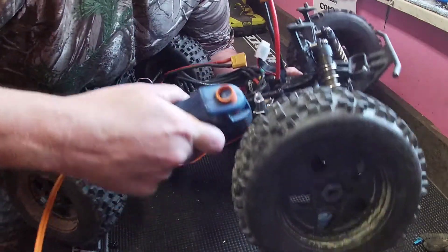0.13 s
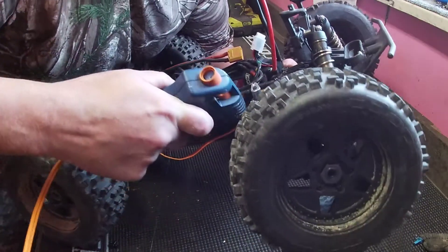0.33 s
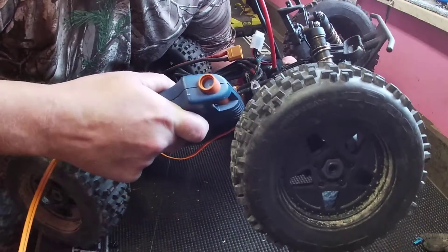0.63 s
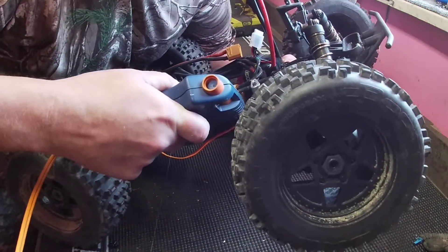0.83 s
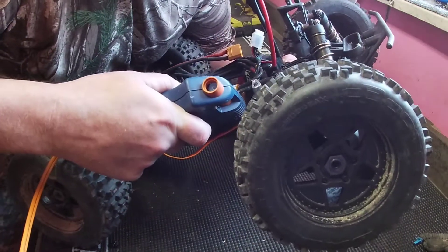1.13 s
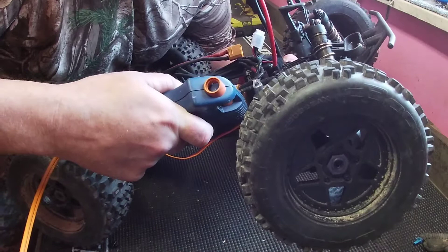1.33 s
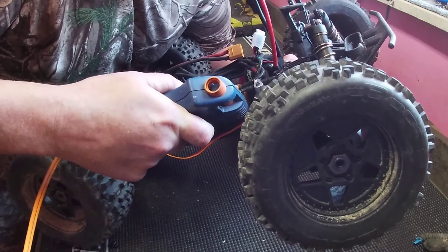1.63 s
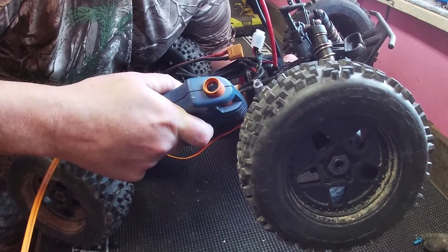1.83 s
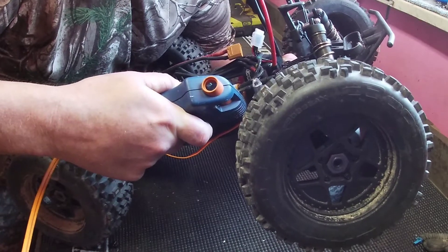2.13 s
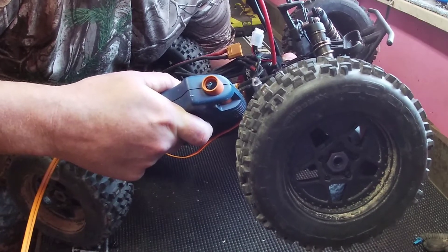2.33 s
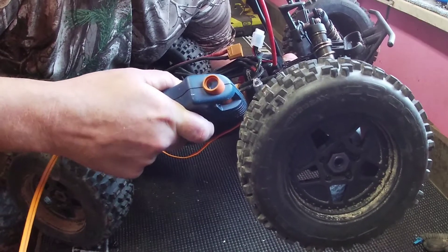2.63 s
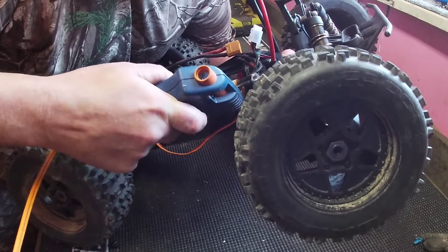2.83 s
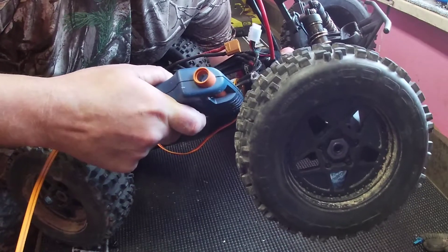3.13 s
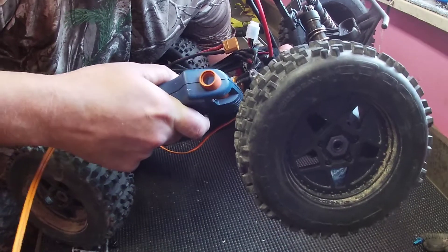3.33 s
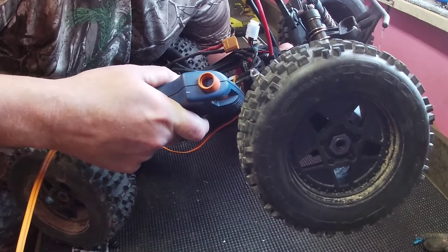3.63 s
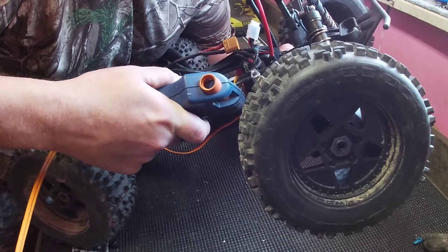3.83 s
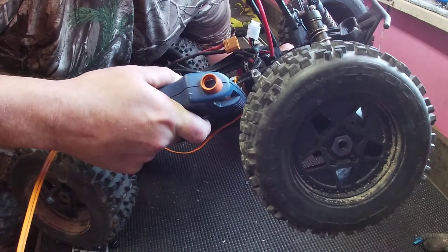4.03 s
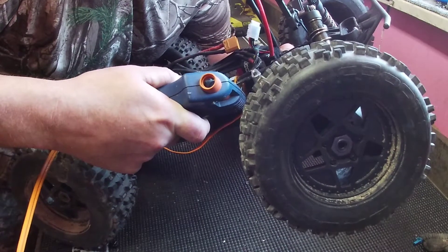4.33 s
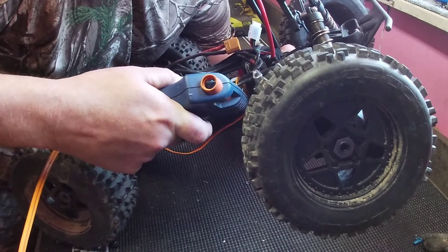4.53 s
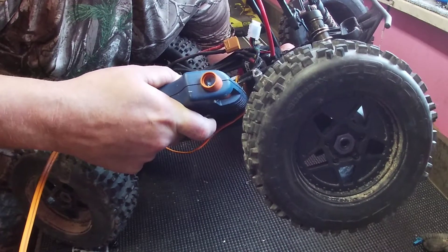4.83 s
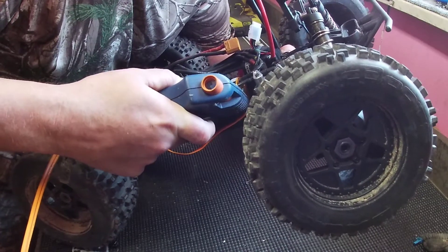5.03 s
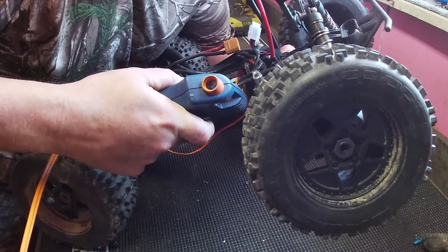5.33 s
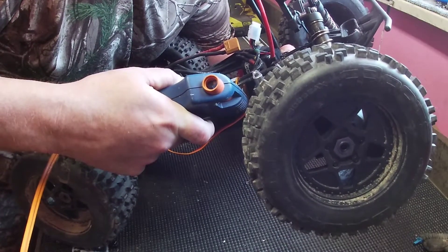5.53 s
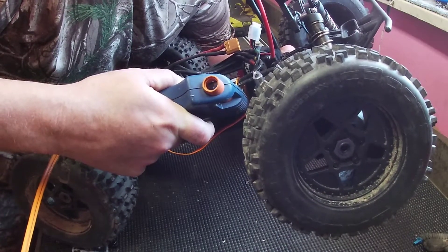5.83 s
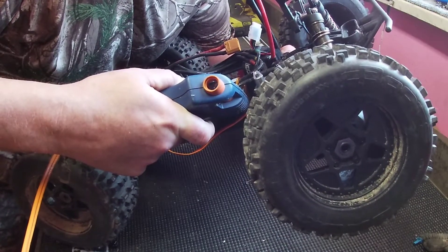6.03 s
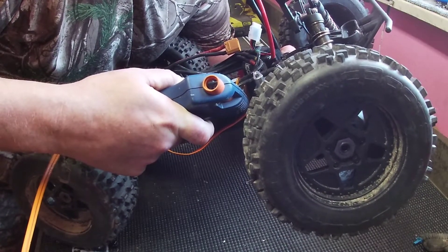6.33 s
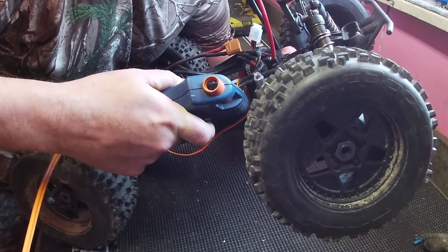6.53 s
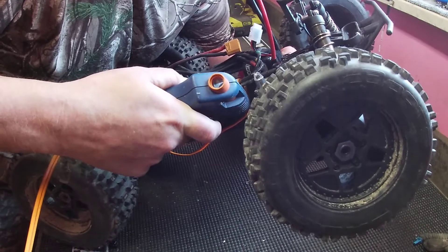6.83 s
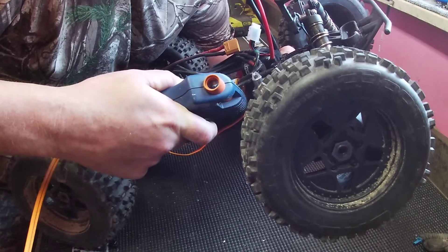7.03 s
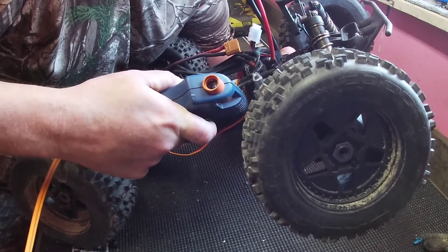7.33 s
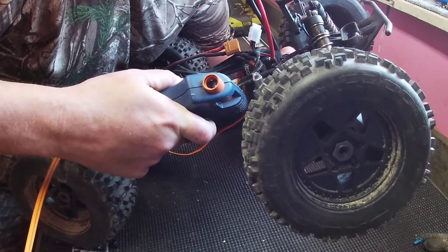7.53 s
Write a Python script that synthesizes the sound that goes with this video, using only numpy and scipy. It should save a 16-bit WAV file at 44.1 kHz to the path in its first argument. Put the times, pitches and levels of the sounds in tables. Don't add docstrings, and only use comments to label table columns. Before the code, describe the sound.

A hand jostles a hollow plastic tool with rattling bounces, skin drag and low microphone rumble. Three trigger squeezes follow, each a grainy, woody-bright creak of quick clicks blurring into rub, with pauses between. Sharp plastic snaps end the squeezes, with little scrapes sliding into them and soft bench thumps below. A fourth creak begins at the end. Very close and dry, with a short small-room reflection.

```python
import sys
import numpy as np
from scipy import signal
from scipy.fft import rfft, irfft
from scipy.io import wavfile
from scipy.ndimage import uniform_filter1d

SR = 44100
rng = np.random.default_rng(int(sys.argv[2]) if len(sys.argv) > 2 else 0)


def decibels_to_gain(level_db):
    exponent = np.asarray(level_db, float) / 20
    return 10 ** exponent


def unload_audio(sound):
    columns = np.transpose(np.atleast_2d(sound))
    steps = np.round(np.clip(columns, -1, 1) * 32767)
    wavfile.write(sys.argv[1], SR, steps.astype(np.int16))


N = 338247

# frequency in Hz, level in dB.
ROOM_TONE = [(18, -37.5), (30, 0), (96, -22), (163, -2), (270, -13), (356, -12), (620, -8), (840, -9.5),
             (1110, -16), (4910, -21), (12500, -33), (16200, -72), (22000, -120)]
ROOM_TONE_DB = -70.5

# start in seconds, length in seconds, first level in dB,
# last level in dB, treble against it in dB.
DRAGS = [(0, 0.11, -37.5, -55.5, -7), (.15, 0.096, -41, -41.5, -3), (.27, 0.38, -47.5, -73, -10.5),
         (.7, 0.28, -67.5, -42.5, -19), (3.24, 0.18, -71.5, -50, -5), (3.57, 0.17, -49, -50, -20),
         (3.87, 0.27, -51, -54, -28), (4.786, .12, -31, -51.5, -44), (4.91, 0.22, -51.5, -39, -12.5),
         (5.185, 0.068, -36, -51, -36), (6.78, .31, -49.5, -47.5, -10), (7.091, 0.067, -31, -57.5, -26),
         (7.17, 0.24, -48.5, -54.5, -16)]
# start in seconds, length in seconds, first level in dB,
# last level in dB, bench boom against it in dB.
LEANS = [(0, 0.15, -43, -67, -4), (.15, 0.4, -42.5, -74.5, 1), (.686, 0.19, -57.5, -71.5, 4.5),
         (2.795, 0.082, -78.5, -95, 19), (3.33, 0.083, -65.5, -65, 15.5), (3.48, 0.19, -59, -58, -3),
         (3.9, 0.22, -55, -68.5, -3.5), (4.786, 0.078, -64, -53, 6.5), (4.9, 0.26, -57, -49.5, -4),
         (6.834, 0.16, -74, -52, 16.5), (7.0, 0.41, -47.5, -61.5, -4)]
HAND_RISE_DB_S, HAND_FALL_DB_S = 500, 223

# start in seconds, length in seconds, first level in dB, last level in dB.
JOLTS = [
    (0, 0.24, -44.5, -39),
    (.19, 0.38, -37, -69),
    (.64, 0.65, -67, -90),
    (3.35, .1, -83.5, -78),
    (3.93, 0.088, -78, -75),
    (4.8, 0.11, -71, -92),
    (5.17, 0.15, -62, -73),
    (6.92, .05, -82.5, -75),
]
JOLT_RISE_DB_S, JOLT_FALL_DB_S = 198.5, 150

# frequency in Hz, width in Hz, level in dB.
SHELL = [(538, 33, 25), (1030, 32, -1.5), (1410, 190, -18.5), (1460, 80, -11), (3363, 15, 2.5),
         (6270, 160, -11.5), (6820, 110, -17), (7400, 23, -14), (7600, 81, -36), (9300, 290, -34.5)]
# start in seconds, peak in dB, hollow ring in dB, its pitch in Hz.
CRACKS = [
    (0.0171, -19.5, -12, 850),
    (6.831, -19, -0.5, 1030),
    (7.122, -9.5, -11.5, 580),
]
# start in seconds, peak in dB, hollow ring in dB,
# its pitch in Hz.
TICKS = [(0.118, -30, -10, 1030), (0.3076, -35.5, 8.5, 1090), (0.8124, -32.5, 2, 3400),
         (0.9329, -31.5, -13, 950), (0.9666, -22.5, -12, 1030), (0.9872, -31.5, -2.5, 1030),
         (3.3342, -39.5, 8.5, 427), (3.4466, -29, -11, 1030), (3.6284, -33.5, -1, 1090),
         (3.6812, -27.5, -39, 1470), (4.7746, -30, -14, 1030), (5.0783, -23.5, -6.5, 1030),
         (5.1207, -29.5, -11, 490), (6.893, -38, 2, 457)]
# start in seconds, peak in dB, hollow ring in dB, its pitch in Hz.
CLATTER = [
    (0.1474, -29.5, -5, 1140),
    (.1585, -22.5, 8, 1460),
    (0.1759, -20, 5.5, 1410),
    (.2017, -26.5, 11.5, 1410),
    (0.2097, -27, 3, 1720),
    (.2215, -27.5, 3.5, 1750),
    (0.6886, -50.5, 12, 626),
    (.915, -44, -14, 1010),
    (3.3598, -44, 1.5, 1340),
]
# start in seconds, peak in dB, hollow ring in dB, its pitch in Hz.
KNOCKS = [(1.0095, -28.5, -3, 3060), (1.0836, -33.5, -11, 1360), (2.6928, -63, 10.5, 1040),
          (3.248, -52, -20, 1006), (3.291, -57, -32, 990), (3.318, -47, -0.5, 960),
          (3.5734, -34.5, -2.5, 1170), (3.6457, -32.5, -4.5, 580), (3.765, -37.5, -10, 720),
          (4.0393, -32.5, 1, 596), (6.8462, -31, -6, 1030)]
# start in seconds, peak in dB, hollow ring in dB, its pitch in Hz.
SNAPS = [
    (2.379, -37.5, -45, 1736),
    (2.413, -41, -19.5, 1750),
    (2.7947, -10, -11.5, 1084),
    (4.6648, -34.5, -12.5, 1037),
    (4.785, -9.5, -10, 1030),
    (5.3784, -64.5, 8, 1319),
    (6.812, -23.5, -2.5, 1220),
    (7.0913, -13, -9, 1860),
]
# treble in dB, rattle length in seconds.
CONTACTS = [
    (3, 0.0064),
    (2, 0.013),
    (-9.5, 0.013),
    (-11.5, 0.008),
    (7, 0.0034),
]

# start in seconds, end in seconds, first level in dB,
# last level in dB, ring in Hz.
SCRAPES = [
    (0.146, .238, -38.5, -46, 1524),
    (2.729, 2.797, -65.5, -30, 1087),
    (3.354, 3.42, -57, -58, 2400),
    (4.715, 4.795, -66, -33.5, 1056),
    (5.211, 5.229, -36.5, -53, 2390),
    (6.753, 6.833, -63, -44, 1140),
    (6.888, 6.95, -61, -65, 2450),
    (6.96, 7.027, -55, -62, 3300),
    (7.053, 7.102, -64, -43, 1470),
]
# start in seconds, end in seconds, first level in dB,
# last level in dB, ring in Hz.
SQUEAKS = [
    (0.691, 0.796, -66.5, -68, 1360),
    (0.885, 1.002, -72.5, -57, 1027),
    (1, 1.143, -61, -69, 2170),
    (3.468, 3.56, -71, -73, 1650),
    (6.9, 7.038, -58.5, -57, 1920),
    (6.94, 7.0, -51, -64, 2597),
    (7.01, 7.042, -61, -60, 950),
]
SCRAPE_RING_DB, SCRAPE_RING_T60_S = 3, 0.017
SQUEAK_RING_DB, SQUEAK_RING_T60_S = 11, 0.033

# start in seconds, peak in dB, pitch in Hz.
THUMPS = [(0.154, -38.5, 168), (0.687, -45.5, 336), (3.321, -50, 180), (3.335, -44, 174),
          (4.781, -47.5, 366), (0.971, -49.5, 463), (2.799, -44, 482), (4.785, -32.5, 500),
          (6.851, -39.5, 200), (6.926, -37, 183), (6.946, -32, 180)]

# start in seconds, length in seconds, first level in dB,
# last level in dB, slips per second.
GLIDES = [(1.03, .14, -46.5, -58.5, 164), (1.22, 0.031, -55, -49, 182), (1.385, .2, -59.5, -48.5, 180),
          (1.6, .4, -55.5, -60.5, 112), (2.02, .21, -40.5, -45, 111), (3.83, 0.11, -55, -41, 164),
          (3.97, 0.36, -54, -58, 106), (4.33, 0.12, -37, -38.5, 107), (5.39, 0.038, -60.5, -59.5, 157),
          (5.455, .085, -51.5, -51, 170), (5.6, .09, -47.5, -48.5, 140), (5.69, .23, -39, -40.5, 119),
          (5.99, .14, -43.5, -51, 109), (6.15, .2, -56, -61.5, 80), (6.46, .15, -40.5, -52, 100),
          (7.17, .08, -39.5, -44.5, 166), (7.315, .03, -48, -47, 152), (7.352, 0.155, -42, -37, 150),
          (7.5, 0.1, -36, -39.5, 100), (7.645, .03, -49, -38.5, 146)]
GLIDE_RISE_DB_S, GLIDE_FALL_DB_S = 900, 400
# start in seconds, peak in dB.
SLIPS = [(1.4586, -31.5), (1.4958, -37), (1.5112, -29.5), (1.526, -29.5), (1.541, -34), (1.5765, -40),
         (1.5954, -25.5), (1.615, -32), (1.6303, -24), (1.6566, -24), (1.6872, -24), (1.7207, -22.5),
         (1.7492, -25), (1.7765, -23.5), (1.8081, -20.5), (1.8416, -21.5), (1.8748, -20.5),
         (1.9053, -21.5), (1.9331, -20), (1.9724, -21), (2.0077, -25), (2.027, -22.5),
         (2.0735, -25.5),
         (4.0706, -27), (4.0828, -28.5), (4.1063, -22.5), (4.1411, -27.5), (4.1643, -31),
                (4.1874, -21), (4.2292, -20.5), (4.2504, -25), (4.2718, -21), (4.29, -22), (4.309, -29),
                (4.3346, -23), (4.365, -27.5), (4.3845, -25),
         (5.7218, -27), (5.9896, -43), (6.0041, -34), (6.018, -30), (6.051, -30.5), (6.1339, -32.5),
               (6.1524, -27), (6.1795, -22), (6.21, -25), (6.2311, -25), (6.258, -25), (6.279, -27.5),
               (6.2992, -22.5), (6.3184, -26), (6.3384, -22), (6.3853, -20.5), (6.4162, -22), (6.4614, -19),
               (6.488, -33), (6.5078, -22.5), (6.5535, -28), (6.5633, -25)]
# frequency in Hz, level in dB, decay t60 in seconds.
BODY = [(1020, -25.5, 0.015), (1231, -19.5, 0.0178), (2115, -10, 0.011), (2400, -22.5, 0.02),
        (2911, -8.5, 0.026), (3085, -3, 0.009), (3560, -5.5, 0.014), (3910, -2.5, 0.0051),
        (4490, -3.5, 0.005), (4800, -12.5, 0.012), (5670, -12, 0.0056), (6125, -9.5, 0.0054),
        (7220, -5.5, 0.0034), (7840, -15.5, 0.01), (8620, -17.5, 0.011), (9480, -9.5, 0.0039),
        (11997, -19.5, 0.0016), (13100, -7.5, 0.0017)]
RUB_DB, RUB_DB_PER_RATE = -3, 0.17
UPPER_DB, LOWER_DB = -9, -3
BRIGHTENS = 0.45
DULLS_DB_PER_RATE = 0.0724
WANDER_DB = 2

DIFFUSERS = [(13, .55), (31, .5)]
ECHO_S, ECHO_DB = 0.0139, -12
CLUTTER_DB, CLUTTER_START_S, CLUTTER_END_S = -4.5, 0.002, 0.0105
ROOM_DB, ROOM_T60_S = -8, 0.22
# frequency in Hz, level in dB.
MIC = [(5200, 5.5), (6600, -2), (8500, 3), (10500, -6), (12500, -21.5), (15000, -17), (15500, -29.5),
       (16000, -60)]


def rms_one(x):
    return x / np.sqrt(np.mean(x ** 2) + 1e-20)


def noise():
    return rng.standard_normal(N)


def band(x, lo_hz, hi_hz):
    return signal.sosfilt(signal.butter(2, [lo_hz, hi_hz], "band", fs=SR, output="sos"), x)


def drift(rate_hz):
    return rms_one(band(noise(), rate_hz / 8, rate_hz))


def ring(x, hz, t60):
    r, w = decibels_to_gain(-60 / (t60 * SR)), 2 * np.pi * hz / SR
    return signal.lfilter([0, np.sin(w)], [1, -2 * r * np.cos(w), r * r], x + 1e-18)


def shaped(x, points):
    hz, level_db = np.transpose(points)
    grid = np.maximum(np.arange(N // 2 + 1) * SR / N, 1)
    return irfft(rfft(x) * decibels_to_gain(np.interp(np.log(grid), np.log(hz), level_db)), N)


def shell(x, lo_hz, hi_hz, broad_db):
    click = np.zeros(8192)
    click[0] = 1
    reply = decibels_to_gain(broad_db) * click
    for hz, width_hz, level_db in SHELL:
        if lo_hz <= hz < hi_hz:
            height = decibels_to_gain(level_db) * width_hz * 6 / SR
            reply = reply + height * ring(click, hz, 1.2 / max(width_hz, 30))
    reply = band(reply, lo_hz, hi_hz)
    return signal.oaconvolve(x, reply / np.linalg.norm(reply))[:N]


def strokes(rows, rise_db_s, fall_db_s):
    t, rows = np.arange(0, N, 32) / SR, np.array(rows, float)
    levels = []
    for start, length, first_db, last_db in rows[:, :4]:
        slope = np.interp(t, [start, start + length], [first_db, last_db])
        rise = rise_db_s * np.maximum(start - t, 0)
        fall = fall_db_s * np.maximum(t - start - length, 0)
        levels.append(slope - rise - fall)
    levels = np.array(levels)
    loudest = np.maximum(levels.max(axis=0), -130)
    columns = np.vstack([loudest, rows[levels.argmax(axis=0), 4:].T])
    return np.repeat(uniform_filter1d(columns, size=8, axis=1), 32, axis=1)[:, :N]


def room_tone():
    hush = decibels_to_gain(ROOM_TONE_DB) * rms_one(shaped(noise(), ROOM_TONE))
    return band(hush, 12, 12000)


def hand():
    drag_db, high_db = strokes(DRAGS, HAND_RISE_DB_S, HAND_FALL_DB_S)
    lean_db, bench_db = strokes(LEANS, HAND_RISE_DB_S, HAND_FALL_DB_S)
    grains = rms_one(noise() * decibels_to_gain(3 * drift(40) + 3 * drift(500)))
    upper = decibels_to_gain(drag_db - 8.5) * shell(grains, 900, 4300, -10.5)
    high = decibels_to_gain(drag_db + high_db - 8) * shell(grains, 4500, 8500, 0)
    hollow = decibels_to_gain(lean_db - 4) * shell(grains, 450, 1500, -11.5)
    bench = decibels_to_gain(lean_db + bench_db - 4.5) * shell(noise(), 130, 270, -19)
    return upper + high + hollow, bench


def microphone_shake():
    level_db = strokes(JOLTS, JOLT_RISE_DB_S, JOLT_FALL_DB_S)[0]
    return decibels_to_gain(level_db) * rms_one(band(noise(), 11, 30))


def knocks():
    upper, low, high = np.zeros((3, N + 4200))
    t = np.arange(4096) / SR
    for rows, (high_db, length) in zip((SNAPS, CLATTER, TICKS, KNOCKS, CRACKS), CONTACTS):
        fade = decibels_to_gain(-30 * t / length)
        for start, peak_db, low_db, low_hz in rows:
            grit = rng.standard_normal(4096) * decibels_to_gain(4 * rng.standard_normal(4096))
            even = np.linalg.norm(fade) / np.linalg.norm(grit * fade)
            rattle = decibels_to_gain(peak_db - 6.5) * grit * fade * even
            hollow = ring(rattle, low_hz, 0.015) + decibels_to_gain(-15.5) * ring(rattle, 507, 0.057)
            first = round(start * SR) + 30
            span = slice(first, first + 4096)
            upper[span] += rattle
            low[span] += hollow * decibels_to_gain(low_db - 11.5)
            high[span] += rattle * decibels_to_gain(high_db)
    bright = shell(upper[:N], 1500, 5060, 0) + shell(high[:N], 3610, 13760, -13.5)
    return bright + band(low[:N], 520, 3600)


def scrapes():
    out, t = np.zeros(N), np.arange(N) / SR
    grit = rms_one(noise() * decibels_to_gain(1.1 * drift(200) + 5 * drift(1100)))
    rows = [(*row, SCRAPE_RING_DB, SCRAPE_RING_T60_S) for row in SCRAPES]
    rows += [(*row, SQUEAK_RING_DB, SQUEAK_RING_T60_S) for row in SQUEAKS]
    for start, end, first_db, last_db, hz, ring_db, t60 in rows:
        span = slice(round(start * SR), round((end + 0.05) * SR))
        level_db = np.interp(t[span], [start, end, end + 0.003], [first_db, last_db, -120])
        stroke = grit[span] * decibels_to_gain(level_db)
        out[span] += band(stroke + decibels_to_gain(ring_db - 22.5) * ring(stroke, hz, t60), 700, 6300)
    return out


def thumps():
    out = np.zeros(N)
    for start, peak_db, hz in THUMPS:
        click = np.zeros(N)
        click[round(start * SR)] = decibels_to_gain(peak_db + 4)
        out += ring(click, hz, 0.083)
    return band(out, 90, 500)


def creak():
    level_db, per_s = strokes(GLIDES, GLIDE_RISE_DB_S, GLIDE_FALL_DB_S)
    dulled_db = DULLS_DB_PER_RATE * (per_s - 110)
    upper_db = UPPER_DB + BRIGHTENS * (level_db + 49) - dulled_db
    lower_db = LOWER_DB - BRIGHTENS * (level_db + 45)
    lower_db, upper_db = np.minimum(lower_db, 5), np.minimum(upper_db, -2)

    turns = np.cumsum(per_s * decibels_to_gain(0.8 * drift(60))) / SR
    chatter = -np.diff(np.floor(turns), prepend=0) * decibels_to_gain(2 * noise())
    rub_db = RUB_DB + RUB_DB_PER_RATE * (per_s - 130)
    drag = rms_one(chatter) + decibels_to_gain(rub_db - 6 + 3 * drift(66)) * noise()

    lone = np.array(SLIPS)
    at, peak_db = ((lone[:, 0] + 0.0006) * SR).astype(int), lone[:, 1]
    spread = decibels_to_gain(1.3 * rng.standard_normal((len(at), len(BODY))))
    wander = rng.standard_normal((len(BODY), N // 64 + 1))
    wander = uniform_filter1d(wander, size=100, axis=1) * 10
    wander = np.repeat(wander, 64, axis=1)[:, :N]

    slips, rubs = np.zeros(N), np.zeros((4, N))
    for k, (hz, mode_db, t60) in enumerate(BODY):
        clicks = np.zeros(N)
        clicks[at] = decibels_to_gain(peak_db + mode_db - 9) * spread[:, k]
        side = (-1) ** (k // 2)
        slips += side * ring(clicks, hz, t60)
        group = np.searchsorted([2600, 3700, 5800], hz)
        rubs[group] += side * decibels_to_gain(mode_db + WANDER_DB * wander[k]) * ring(drag, hz, t60)
    lower, middle, edge, upper = map(rms_one, rubs)
    modes = decibels_to_gain(lower_db) * lower + middle + decibels_to_gain(-dulled_db - 4) * edge + decibels_to_gain(upper_db) * upper
    dragged = decibels_to_gain(level_db - 9) * modes
    thin = signal.butter(6, 880, "high", fs=SR, output="sos")
    return signal.sosfilt(thin, slips + dragged)


def surroundings(x):
    t = np.arange(SR // 2) / SR
    scatter = rng.choice([-1, 1], len(t))
    clutter = scatter * (t > CLUTTER_START_S) * (t < CLUTTER_END_S)
    tail = scatter * decibels_to_gain(-60 * t / ROOM_T60_S) * (t > CLUTTER_END_S)
    reply = decibels_to_gain(CLUTTER_DB) * clutter / np.linalg.norm(clutter)
    reply = reply + decibels_to_gain(ROOM_DB) * tail / np.linalg.norm(tail)
    reply[0] = 1
    reply[round(ECHO_S * SR)] = decibels_to_gain(ECHO_DB)
    for lag, back in DIFFUSERS:
        taps = np.r_[1, np.zeros(lag - 1), -back]
        reply = signal.lfilter(taps[::-1], taps, reply)
    return signal.oaconvolve(x, reply)[:N]


def scene():
    skin, bench = hand()
    shake = microphone_shake()
    hush = room_tone()
    gun = creak() + knocks() + scrapes() + skin
    near = shaped(surroundings(gun), MIC)
    mono = near + bench + thumps() + shake + hush
    return np.tile(mono, (2, 1))


def top_cut(x):
    return signal.sosfilt(signal.butter(12, 16370, fs=SR, output="sos"), x)


def record(dry):
    return top_cut(dry)


dry = scene()
out = record(dry)
unload_audio(out)
```